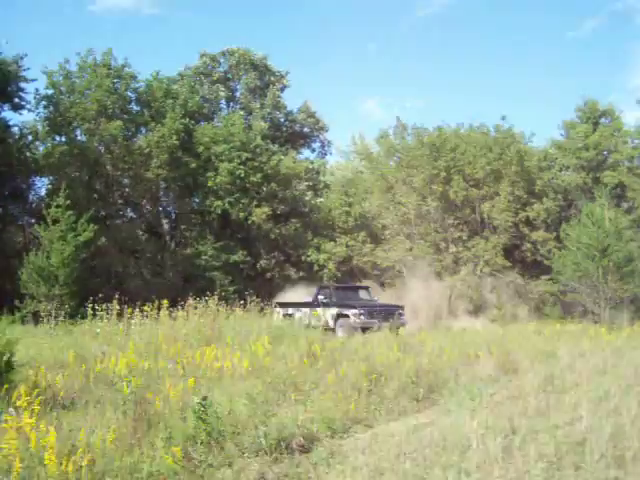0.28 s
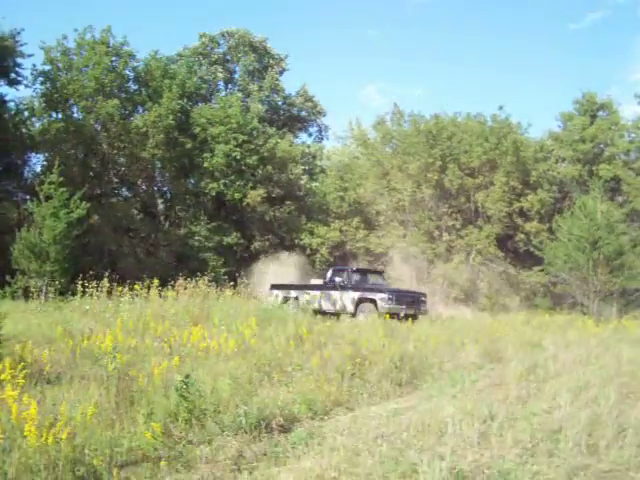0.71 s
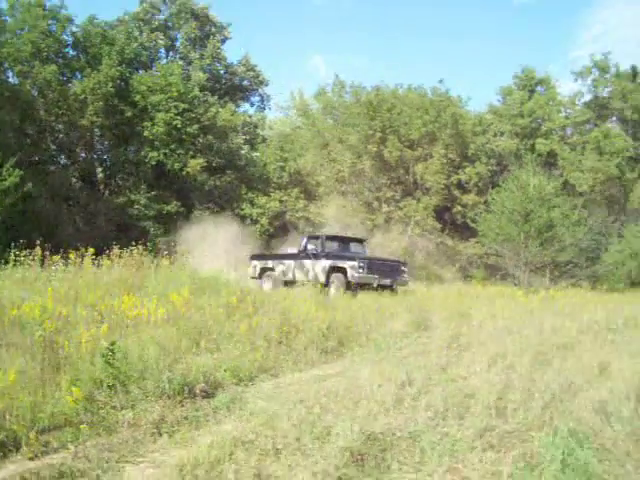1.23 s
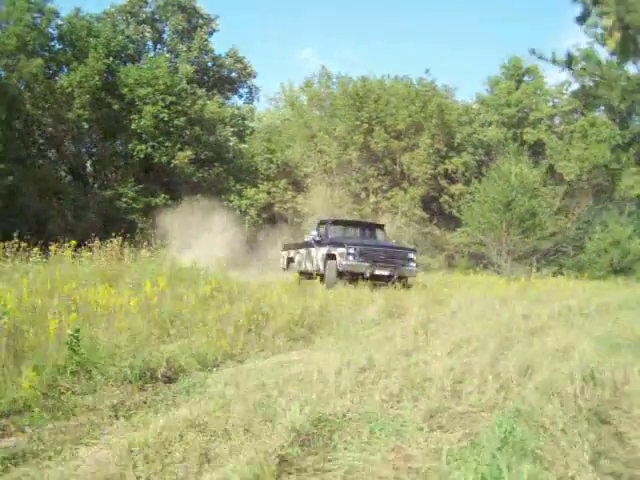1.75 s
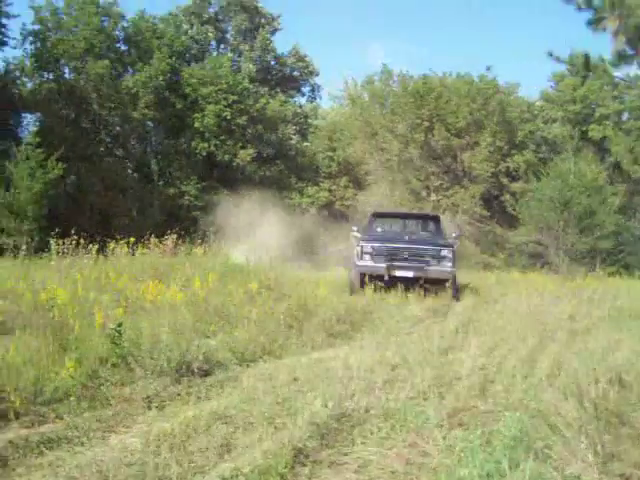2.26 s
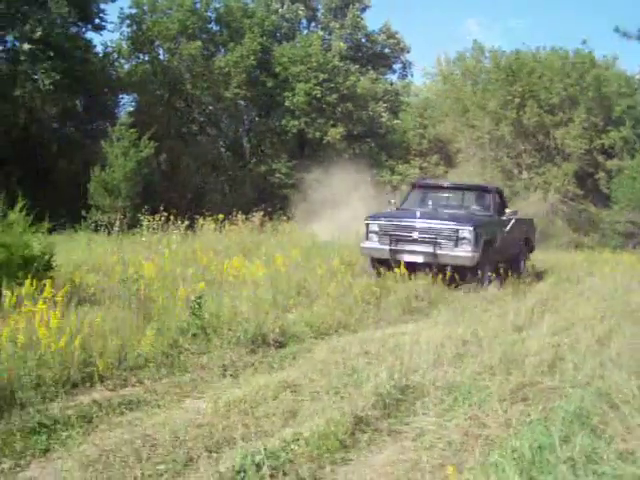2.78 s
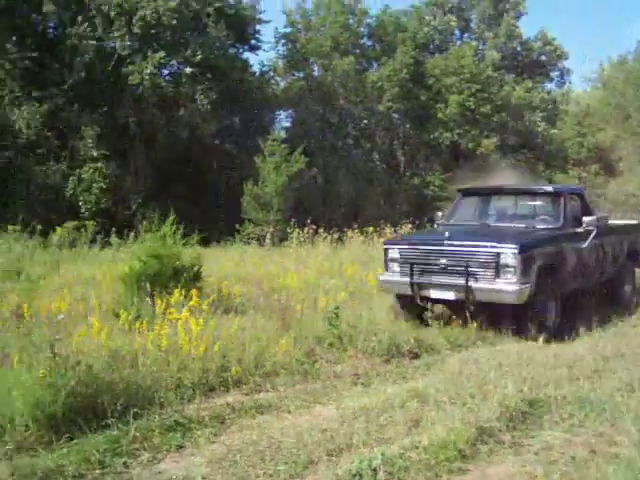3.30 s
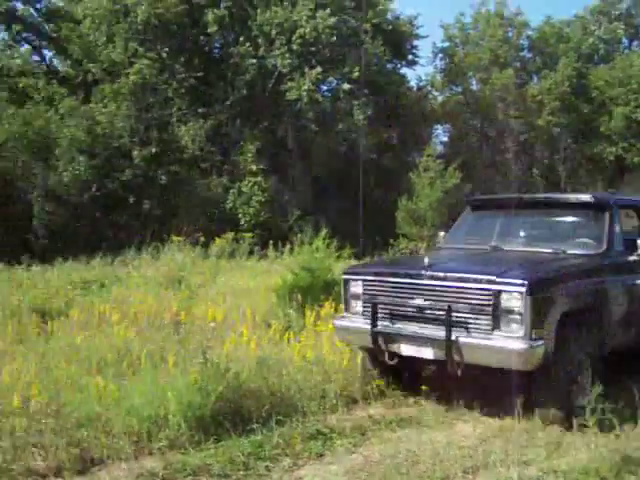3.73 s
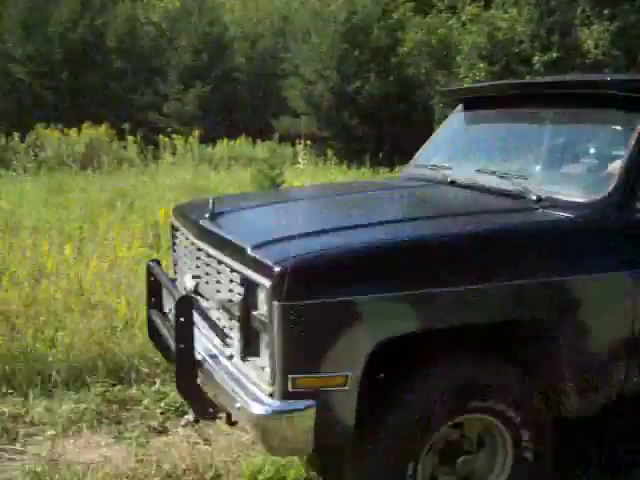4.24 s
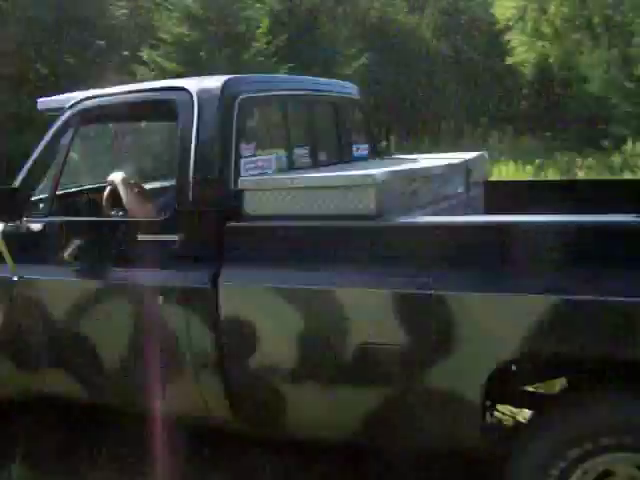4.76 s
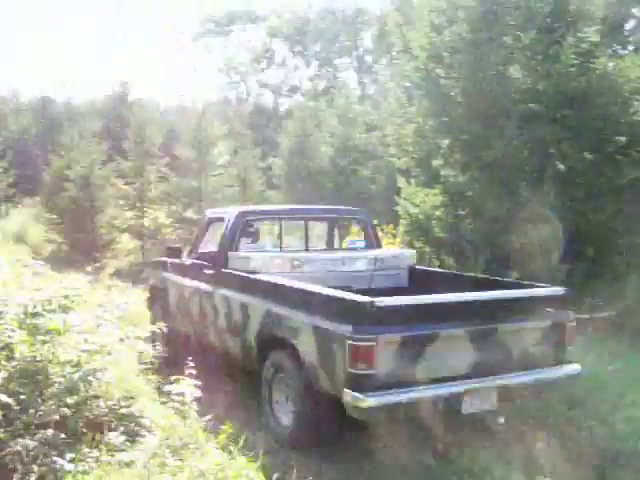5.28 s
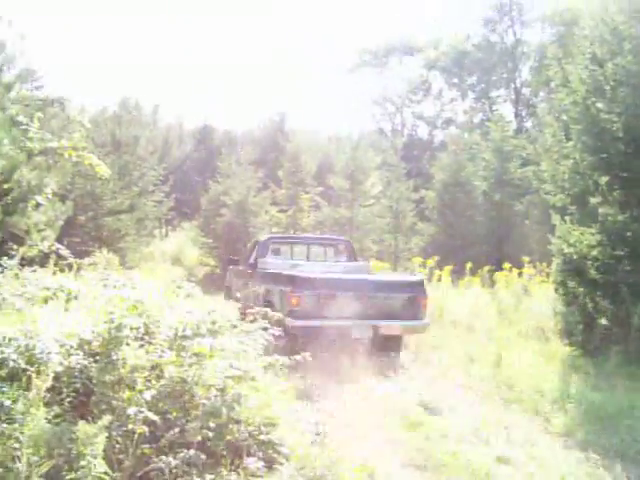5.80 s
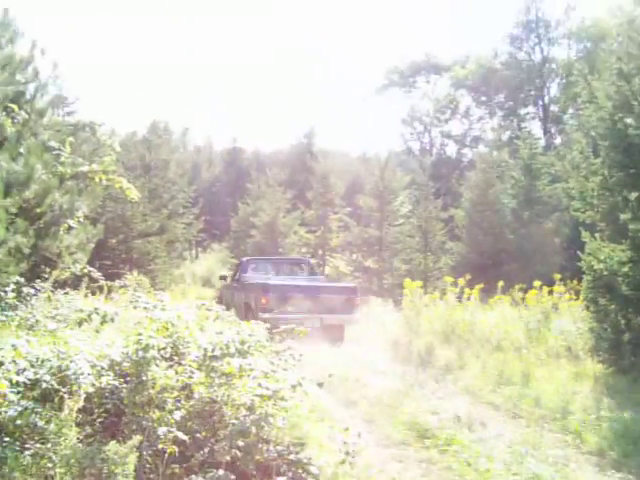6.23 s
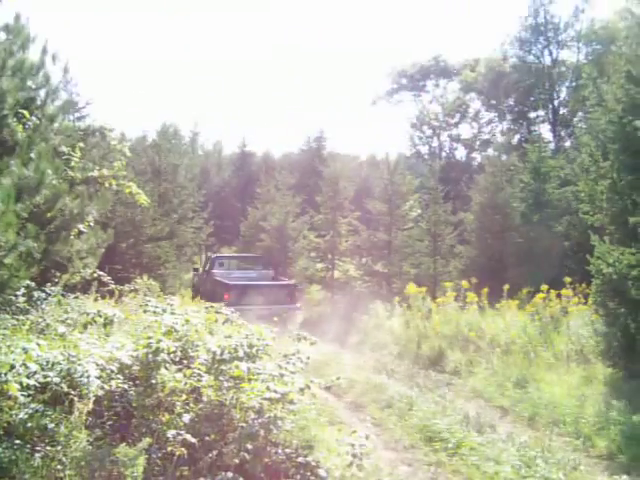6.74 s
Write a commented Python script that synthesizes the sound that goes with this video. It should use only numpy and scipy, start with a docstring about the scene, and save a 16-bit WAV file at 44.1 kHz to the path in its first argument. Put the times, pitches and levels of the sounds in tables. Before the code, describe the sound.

Loud, uneven truck engine revs past the microphone, drops abruptly to a low boom and lumpy idle, with swishing grass, snapping stalks and clanking panels.

```python
"""In a grassy field an old V8 pickup revs past a microphone, then lifts off the throttle and idles on.
Eight uneven firings ring the exhaust modes; each puffs out gas noise and spits through a leak.
Off the throttle a sine at the firing rate booms; burbles swell out of the exhaust.
Flickering noise bands make the rush of grass and air; noise bursts make snapping stalks and clanking
panels; short tones make a squeaking spring, and low noise the drumming tyres."""
import sys
import numpy as np
from scipy import signal
from scipy.io import wavfile
from scipy.ndimage import uniform_filter1d

SR = 44100
rng = np.random.default_rng(int(sys.argv[2]) if len(sys.argv) > 2 else 0)


def to_wav(s):
    """Save 16-bit WAV."""
    ch = np.atleast_2d(s).T  # columns
    pcm = np.round(np.clip(ch, -1, 1) * 32767)  # PCM
    wavfile.write(sys.argv[1], SR, pcm.astype(np.int16))


N = 309132
TIME = np.arange(N) / SR


def undb(db):
    """Decibel law: amplitude gain of a level in dB."""
    return 10 ** (np.asarray(db) / 20)


def unit(x):
    """Power normalization: scale to rms 1."""
    return x / np.sqrt(np.mean(x ** 2))


def curve(table):
    """Linear interpolation of (seconds, value) rows over the whole scene."""
    return np.interp(TIME, *np.transpose(table))


def ring(x, hz, width_hz):
    """Resonance: one damped mode with gain 1 at its centre."""
    return signal.lfilter(*signal.iirpeak(hz, hz / width_hz, fs=SR), x)


def ring_twice(x, hz, width_hz):
    """Cascaded resonance: two equal modes in series give steeper skirts."""
    return ring(ring(x, hz, width_hz), hz, width_hz)


def walk(rate):
    """Slow modulation: random levels held 1 / rate s and smoothed twice, scaled to a spread near 1."""
    hold = int(SR / rate)
    steps = np.repeat(rng.standard_normal(N // hold + 1), hold)
    smooth = uniform_filter1d(uniform_filter1d(steps, hold), hold)
    return unit(smooth[:N])


def clicks(times, sizes):
    """Impulsive excitation: each impulse is shared between its two nearest samples."""
    place = np.clip(times * SR, 0, N - 2)
    whole, out = place.astype(int), np.zeros(N)
    np.add.at(out, whole, sizes * (1 - place + whole))
    np.add.at(out, whole + 1, sizes * (place - whole))
    return out


def fade(x, t60):
    """Exponential decay: every impulse rises at once and falls 60 dB in t60 seconds."""
    return signal.lfilter([1], [1, -np.exp(-np.log(1000) / (t60 * SR))], x)


# When the truck stands side-on, three-quarter and nose-on. Each entry: time in seconds.
STANCES_S = (1.7, 2.75, 4.0)


def per_firing(patterns, index, times):
    """Directivity: each cylinder's value passes from stance to stance as the truck turns."""
    each = np.array([np.interp(times, STANCES_S, c) for c in np.transpose(patterns)])
    return each[index % 8, np.arange(len(index))]


# Engine speed. Each row: time in seconds, firings per second.
ENGINE_SPEED = [(0.0, 140.1), (0.12, 145.1), (0.37, 135.2), (0.79, 138.9), (1.16, 134.1), (1.35, 124.5),
                (1.72, 138.0), (1.87, 154.2), (2.08, 160.9), (2.19, 175.2), (2.52, 173.3), (2.75, 196.7),
                (2.98, 176.1), (3.08, 185.6), (3.27, 163.4), (3.54, 149.0), (3.74, 152.6), (3.99, 132.9),
                (4.22, 144.9), (4.53, 139.5), (4.62, 126.8), (4.76, 83.7), (5.1, 49.9), (5.44, 36.2),
                (5.84, 34.0), (6.04, 43.5), (7.01, 46.8)]
# Strength of the firings. Each row is one stance; its columns are the eight cylinders' levels in dB,
# in firing order.
STRENGTH_DB = [(1, 1.2, -1, -0.97, 2.3, -6, 0.88, 1.4), (4.4, 1.2, 0.4, -1.5, 0.66, -4, 1.9, 3),
               (1.8, 2.2, -2, 0, 2, -5.5, 1.3, 0)]
# Lateness while the engine pulls. Each row is one stance; its columns are the eight cylinders' delays
# in firing intervals.
LATENESS = [(.32, -.13, .06, .28, -.29, .34, -.13, -.32), (.24, -.22, .01, .19, -.35, .27, -.19, -.39),
            (.21, -.03, -.07, .12, -.17, .14, -.07, -.28)]
# Manifold travel against the mean while the engine pulls. Each entry: one cylinder's delay in seconds.
MANIFOLD_S = [-.00222, .00072, -.00032, -.00274, .0015, -.00143, 0, .00133]
FIRST_FIRING = 4.17  # firing count at the start
IDLE_HZ, PULLING_HZ = 60, 125  # firings per second


def firings():
    """Quasi-periodic excitation: a pulse per firing, uneven in strength and timing."""
    hz = curve(ENGINE_SPEED)
    count = FIRST_FIRING + np.cumsum(hz) / SR
    index = np.arange(int(count[0]) + 1, int(count[-1]))
    even_times = np.interp(index, count, TIME)
    firing_hz = np.interp(index, count, hz)
    strength_db = per_firing(STRENGTH_DB, index, even_times)
    late = per_firing(LATENESS, index, even_times)
    time_chance, level_chance = rng.standard_normal((2, len(index)))
    # the slower the engine turns, the less alike its firings are
    lope = np.clip(IDLE_HZ / firing_hz, 0, 1) ** 3
    # the gallop of the manifold shows only while the engine pulls
    pull = np.clip(firing_hz / PULLING_HZ, 0, 1) ** 4
    uneven = index + pull * late + (0.01 + 0.07 * lope) * time_chance
    times = np.interp(uneven, count, TIME) + pull * MANIFOLD_S_AT(index)
    pulses = clicks(times, undb(strength_db + (0.4 + 2 * lope) * level_chance))
    return hz, count, index, times, pulses


def MANIFOLD_S_AT(index):
    """Propagation delay: the manifold travel of each firing's own cylinder."""
    return np.array(MANIFOLD_S)[index % 8]


# Exhaust pipe modes. Each row: centre in Hz, width in Hz, relative level in dB, polarity.
PIPE_MODES = [(41.5, 21.1, -10.3, -1), (97.5, 53.4, -2.7, 1), (117.1, 45.2, 0.0, -1),
              (217.5, 37.2, -5.6, 1), (213.9, 21.9, -7.5, -1), (295.9, 21.9, -27.0, -1),
              (322.4, 27.6, -29.4, -1), (365.4, 142.5, -36.0, -1)]
# Gain of the upper pipe modes as the truck turns. Each row: time in seconds, gain in dB.
BARK = [(0, 0), (.9, 3), (1.7, -0.5), (2.3, 2.5), (2.75, 1.5), (3.2, 2), (3.8, 0), (4.4, 6.5), (4.7, -2.5),
        (5.2, 2.5), (5.8, -2), (7.01, -5.5)]
BARK_FROM_HZ = 200
# Drum of the idling tailpipe. The entries: centre in Hz, width in Hz, relative level in dB.
TAILPIPE = (90, 14, -5)


def exhaust_pipe(pulses, hz):
    """Modal superposition: the firings ring all pipe modes, levelled to a steady loudness."""
    bark = undb(curve(BARK))
    pipe = bark * undb(-35) * ring_twice(pulses, 486, 160)
    for f, width, db, sign in PIPE_MODES:
        gain = bark if f > BARK_FROM_HZ else 1
        pipe = pipe + gain * sign * undb(db) * ring(pulses, f, width)
    idling = np.clip(1 - hz / IDLE_HZ, 0, 1) ** 0.5
    drum_hz, drum_width, drum_db = TAILPIPE
    pipe = pipe + idling * undb(drum_db) * ring(pulses, drum_hz, drum_width)
    # loudness must not depend on which mode the firing rate passes through
    power = uniform_filter1d(pipe ** 2, size=SR // 4)
    return pipe / np.sqrt(power + 1e-12)


# Level of the exhaust: nearly steady until 4.6 s, then low at idle. Each row: time in seconds, level in dB.
EXHAUST = [(0, -15.5), (2.21, -14.5), (3.01, -15), (3.78, -14.5), (4.27, -16.5), (4.58, -14), (4.66, -20),
           (4.71, -37), (5.4, -33.5), (7.01, -21)]
# Uneven idle swells. Each row: start in seconds, length in seconds, level in dB.
BURBLES = [(4.727, 0.021, -18.5), (4.771, 0.18, -24.5), (5.005, 0.11, -20.5), (5.19, 0.05, -23),
           (5.561, 0.052, -20.5), (5.69, 0.068, -18.5), (5.83, 0.039, -19.5), (5.889, 0.092, -19.5),
           (5.995, 0.044, -18.5), (6.058, 0.073, -16), (6.2, 0.026, -16), (6.35, 0.056, -19.5),
           (6.44, 0.037, -18), (6.531, 0.064, -17), (6.596, 0.068, -20.5), (6.797, 0.056, -18.5),
           (6.89, 0.074, -19.5)]
BURBLE_EDGE_S = 0.02


def exhaust_gain():
    """Amplitude modulation: idle burbles swell out of the steady exhaust level."""
    gain = undb(curve(EXHAUST))
    for start, length, db in BURBLES:
        # each edge is centred on the start or end
        inside = np.minimum(TIME - start, start + length - TIME) / BURBLE_EDGE_S + 0.5
        gain = np.maximum(gain, undb(db) * np.clip(inside, 0, 1))
    return gain


# Mean level of the firing tone. Each row: time in seconds, level in dB.
BOOM = [(4.55, -45), (4.68, -33), (4.8, -20), (4.95, -22), (5.1, -32), (5.3, -35), (5.6, -40), (6, -25),
        (6.4, -31.5), (7.01, -29)]


def tailpipe_boom(count):
    """Fundamental radiation: off the throttle the bare firing tone booms out of the tailpipe."""
    tone = np.sqrt(2) * np.sin(2 * np.pi * count)  # rms 1
    return undb(curve(BOOM) + 1.5 * walk(15)) * tone


# Colour of the gas roar. Each row: centre in Hz, width in Hz, relative level in dB.
ROAR_MODES = [(394, 86, -8), (579, 106, 2.5), (653, 42, -2), (930, 81, -12.5), (1356, 71, -12)]


def gas_roar(pulses):
    """Flow noise: turbulent gas, puffed out by each firing, excites broad resonances."""
    puffs = (1.3 + unit(fade(pulses, 0.033))) * rng.standard_normal(N)
    return unit(sum(undb(db) * ring(puffs, f, width) for f, width, db in ROAR_MODES))


# How hard each cylinder spits, in firing order. Each entry: relative level in dB.
SPIT_DB = [-10, -14, -15, -13, -9, -12, 0, -8]
# The leak, heard best while the truck shows its side. Each row: time in seconds, level in dB.
LEAK = [(0, -42.5), (.4, -39.5), (.8, -34.5), (1.2, -36), (1.6, -38.5), (2, -42), (2.6, -41), (3.3, -46),
        (4.5, -47), (4.8, -52), (7, -40.5)]
LEAK_LEAD_S = 0.00409  # the leak speaks before the firing's pulse
SPIT_RISE_S, SPIT_T60_S = 0.008, 0.024
HEADER_AT_HZ, HEADER_POWER = 187.6, 3.26  # reference firings per second, growth with engine speed


def exhaust_leak(hz, index, times):
    """Jet noise and resonance: blows spit through a leak and ring its header pipe."""
    sizes = undb(np.array(SPIT_DB)[index % 8] + 1.2 * rng.standard_normal(len(index)))
    blows = clicks(times - LEAK_LEAD_S, sizes)
    spits = fade(fade(blows, SPIT_RISE_S), SPIT_T60_S) * rng.standard_normal(N)
    leak = unit(ring(ring(spits, 4880, 1800), 4200, 3300))
    # the header rings more the faster the engine turns
    header_gain = undb(-34) * (hz / HEADER_AT_HZ) ** HEADER_POWER
    header = header_gain * unit(ring_twice(blows, 540, 68))
    return header + undb(curve(LEAK)) * leak


def engine(roar_db):
    """Source and filter: one train of firings drives the pipe, boom, gas roar and leak."""
    hz, count, index, times, pulses = firings()
    exhaust = exhaust_gain() * exhaust_pipe(pulses, hz)
    roar = undb(roar_db) * gas_roar(pulses)
    return exhaust + tailpipe_boom(count) + roar + exhaust_leak(hz, index, times)


# Stalks snapping and panels clanking. Each row: start in seconds, nominal peak in dB (twice the noise
# rms before shaping), centre in Hz, decay time by 60 dB in seconds.
CRACKS = [(1.534, -20.5, 2900, 0.025), (3.566, -17, 3600, 0.03), (4.0964, -11, 3570, 0.026),
          (4.7006, -23.5, 5170, 0.092), (4.743, -23.5, 5230, 0.13), (4.821, -16, 4360, 0.05),
          (4.9705, -13, 2980, 0.038), (5.071, -14, 3600, 0.05), (5.2367, -3, 3720, 0.017),
          (5.323, -18, 3930, 0.044), (5.3586, -12, 3740, 0.032), (5.429, -10, 3400, 0.038),
          (5.4943, -19, 2910, 0.031), (5.5537, -12, 3530, 0.025), (5.8282, -9, 3430, 0.037),
          (5.911, -12.5, 3700, 0.05), (6.1603, -14, 3480, 0.086), (6.208, -22, 3270, 0.042),
          (6.4124, -20, 3420, 0.058), (6.4507, -20, 3370, 0.05), (6.488, -21, 4070, 0.053),
          (6.511, -6.5, 3960, 0.019), (6.726, -13.5, 3380, 0.022), (6.8227, -24, 4340, 0.05),
          (6.9168, -5, 3770, 0.015)]


def cracks():
    """Transient radiation: a short noise burst around its own centre, over a duller knock."""
    out, span = np.zeros(N + SR), TIME[:SR // 5]
    for start, peak_db, hz, t60 in CRACKS:
        noise = rng.standard_normal(len(span))
        burst = unit(ring(noise, hz, 270))
        burst = burst + 0.067 * unit(ring(noise, 2000, 3300)) + 0.088 * unit(ring(noise, 440, 300))
        shape = (1 - np.exp(-span / 0.0026)) * undb(-60 * span / max(t60, 0.005))
        out[int(start * SR):][:len(span)] += undb(peak_db) / 2 * shape * burst
    return out[:N]


def swish():
    """Exponential decay: gain of the grass swish that each crack drags behind it."""
    crack_s, crack_db = np.transpose(CRACKS)[:2]
    return fade(clicks(crack_s, undb(crack_db - 14)), 0.09)


# Spring squeaks over bumps. Each row: start in seconds, peak level in dB, pitch in Hz.
SQUEAKS = [(3.306, -25.5, 1003), (3.406, -28.5, 1007), (3.511, -23, 956), (3.873, -27, 980),
           (4.205, -26, 998)]


def squeaks():
    """Friction tone: a dry spring gives short sines with soft, bell-shaped edges."""
    out = np.zeros(N)
    for start, peak_db, hz in SQUEAKS:
        shape = np.exp(-((TIME - start - 0.012) / 0.01) ** 2)  # peaks 12 ms after the start
        out += undb(peak_db) * shape * np.sin(2 * np.pi * hz * TIME)
    return out


def snaps():
    """Shot noise: scattered small snaps, most faint and a few strong, as an envelope of rms 1."""
    when, size = rng.random((2, 700))
    hits = clicks(when * N / SR, undb(-3.0 * np.log(size + 0.011)))
    return unit(fade(fade(hits, 0.0054), 0.032))


# Colour of the rushing before the microphone. Each row: frequency in Hz, relative level in dB per Hz.
RUSH_COLOUR = [(410, -30), (700, -1.5), (909, -0.5), (1060, -1), (1870, -6.5), (2100, -3.5), (2480, -4),
               (3530, -2.5), (6830, -15.5), (8500, -69), (11000, -69), (18700, -120)]


def rushing(gain):
    """Band-filtered noise: grass on tyres and body in third-octaves that flutter together and alone."""
    out, gust, (hz, db) = 0, walk(6.0), np.transpose(RUSH_COLOUR)
    shared = 0.77 + 0.23 * snaps()
    for f in 800 * 2 ** np.arange(0, 3.5, 1 / 3):
        band = unit(ring_twice(rng.standard_normal(N), f, f / 3))
        # a band's power grows with its width, hence with f
        colour_db = np.interp(np.log(f), np.log(hz), db) + 10 * np.log10(f)
        flutter_db = 0.25 * gust + 1.64 * walk(20)
        out = out + undb(colour_db + flutter_db) * band * (shared + 0.29 * snaps())
    return gain * unit(out)


# Tyres on the ground. Each row: time in seconds, mean level of the 170 Hz part in dB.
RUMBLE = [(0, -29), (2, -34.5), (4.55, -35), (4.68, -36.5), (4.85, -26), (5.1, -26.5), (5.5, -27),
          (5.9, -31.5), (6.3, -31.5), (6.7, -37.5), (7.01, -34)]


def rumble():
    """Low-frequency random excitation: tyres drum on the soft ground in two bands of noise."""
    high, low = rng.standard_normal((2, N))
    drum = unit(ring_twice(high, 170, 220)) + 1.28 * unit(ring(low, 60, 87))
    return undb(curve(RUMBLE) + 1.5 * walk(12)) * drum


# Noise of the truck. Each row: time in seconds, gas roar in dB, rushing of grass and air in dB.
TRUCK_NOISE = [(0, -43, -38.5), (.3, -42, -36.5), (1.46, -38.5, -34), (3.0, -33.5, -33.5),
               (3.4, -35.5, -35.5), (4.05, -35, -32.5), (4.2, -29.5, -29), (4.51, -29, -29),
               (4.65, -39.5, -41.5), (4.74, -40, -34.5), (4.86, -24.5, -27.5), (5.1, -26.5, -25.5),
               (5.56, -22, -27), (5.63, -26.5, -29), (5.98, -25.5, -25), (6.12, -29, -35), (6.2, -29, -29),
               (6.5, -29, -29.5), (6.6, -29, -32.5), (6.74, -27.5, -35.5), (6.89, -34, -29.5),
               (7.01, -26, -26.5)]


def scene():
    """Superposition: all sources add at one microphone across open grass."""
    seconds, *columns = np.transpose(TRUCK_NOISE)
    roar_db, rush_db = (np.interp(TIME, seconds, c) for c in columns)
    grass = rushing(undb(rush_db) + swish())
    return (engine(roar_db) + cracks() + squeaks() + grass + rumble())[None]


# Treble resonance of the microphone. The entries: centre in Hz, width in Hz, level in dB.
MIC_PEAK = (3810, 660, 0.0)
TOP_HZ = 8650


def record(dry):
    """Transducer response: bass loss, a treble resonance, soft saturation and a steep roll-off."""
    x = signal.sosfilt(signal.butter(2, 22, "high", fs=SR, output="sos"), dry)
    peak_hz, peak_width, peak_db = MIC_PEAK
    x = x + undb(peak_db) * ring(x, peak_hz, peak_width)
    rounded = np.tanh(0.79 * x) / 0.79
    x = signal.sosfilt(signal.butter(6, 7400, fs=SR, output="sos"), rounded)
    return signal.sosfilt(signal.ellip(10, 0.5, 70, TOP_HZ, fs=SR, output="sos"), x)


dry = scene()
out = record(dry)
to_wav(out)
```